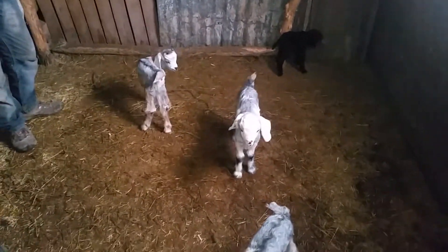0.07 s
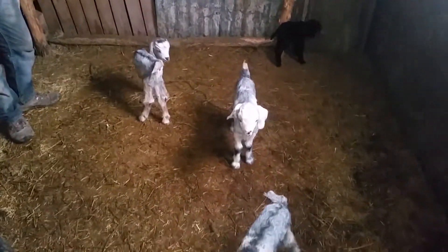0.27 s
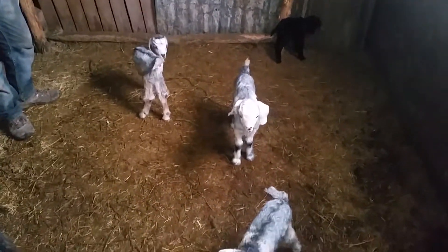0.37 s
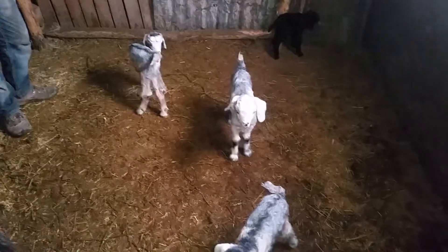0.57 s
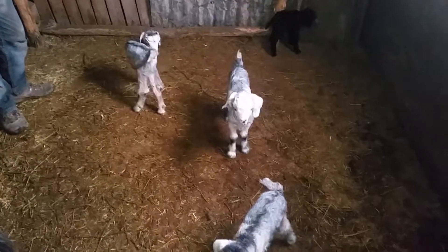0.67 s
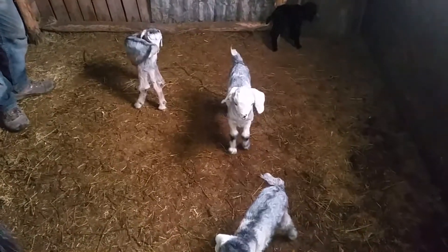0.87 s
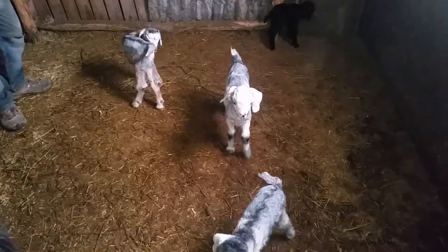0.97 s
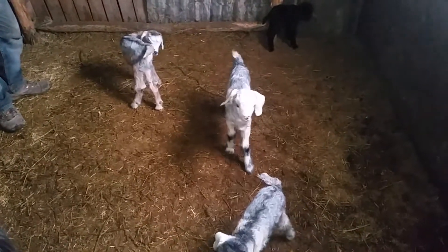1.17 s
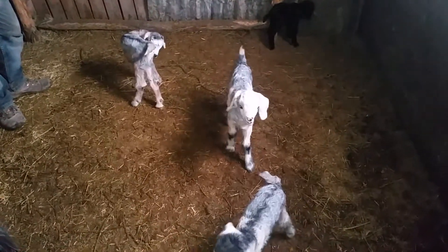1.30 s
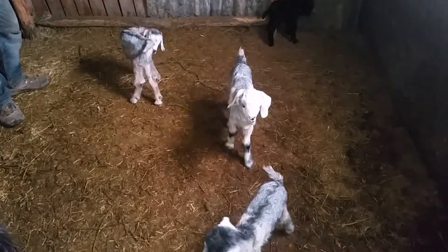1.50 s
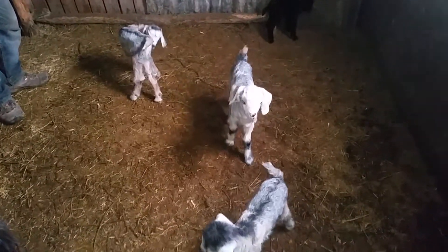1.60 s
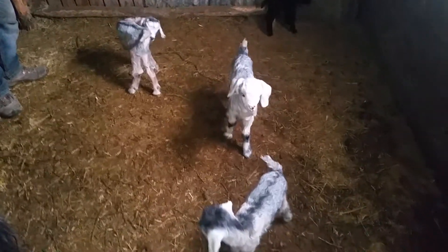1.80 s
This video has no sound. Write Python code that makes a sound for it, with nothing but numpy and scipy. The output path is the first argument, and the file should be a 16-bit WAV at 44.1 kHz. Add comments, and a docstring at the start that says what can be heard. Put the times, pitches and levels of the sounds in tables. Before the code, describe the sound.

Goat kids step about close by on the left in a small shed. Their hooves thud softly, knock on wood and rustle and snap dry straw. The rustling fades, leaving two lone steps over a low rumble.

```python
"""Goat kids step about on the straw-covered earth floor of a small shed, close by and to the left.
Their hooves thud softly on the earth, and a few knock on wood and make it ring. Straw hisses as its
stalks rub together, and some of them snap. The rustle dies away after a second and leaves two lone
steps over a low rumble."""
import sys
import numpy as np
from scipy import signal
from scipy.fft import rfft, irfft
from scipy.io import wavfile

SR = 44100
rng = np.random.default_rng(int(sys.argv[2]) if len(sys.argv) > 2 else 0)


def unload_audio(sound):
    """Save the sound as a 16-bit wav file, at the path given as the first command line argument."""
    columns = np.transpose(np.atleast_2d(sound))
    # keep every value between -1 and 1, then stretch to whole-number steps
    steps = np.round(np.clip(columns, -1, 1) * 32767)
    wavfile.write(sys.argv[1], SR, steps.astype(np.int16))


N = 81585
TIME = np.arange(N) / SR
FFT_SIZE = 2 ** 17
FREQS = np.arange(FFT_SIZE // 2 + 1) * SR / FFT_SIZE

# soft steps on the earth: t/s, level/dB, f/Hz
STEPS = [(0.045, -40, 221), (0.12, -39, 260), (0.238, -28.5, 228), (0.254, -26, 189), (0.262, -32, 300),
         (0.291, -30.5, 180), (0.308, -33, 280), (0.336, -34.5, 253), (0.352, -29, 232),
         (0.384, -33.5, 248.4), (0.423, -30, 278), (0.446, -34, 325), (0.647, -25.5, 289),
         (0.652, -24, 170), (0.673, -24, 251), (0.684, -26.5, 332), (0.71, -34, 302), (0.750, -55, 200),
         (1.124, -30, 225.6), (1.137, -33.5, 160), (1.157, -38, 227.5), (1.172, -42.5, 204),
         (1.286, -45, 281), (1.470, -48.5, 261), (1.589, -38, 276), (1.624, -44, 248), (1.719, -48.5, 237),
         (1.736, -45.5, 282)]
# the shed's own low notes: f/Hz, level/dB, ring time/s
SHED_NOTES = [(97, -8, 0.083), (170, -23, 0.14), (233.5, -19, 0.45), (300, -21, 0.19), (350.5, -20.5, 0.32)]


def thuds():
    """Each step is a short thump with a dull push of weight under it; the shed hums in answer."""
    steps = [(from_db(db) * SR / hz * click(s), hz) for s, db, hz in STEPS]
    push = low_pass(sum(force for force, hz in steps), hz=120, order=3)
    thump = sum(low_pass(band(force, hz, ratio=1.323), 1.4 * hz) for force, hz in steps)
    floor = thump + from_db(-19) * push
    return in_shed(floor, room_db=0.5) + from_db(-38) * ring(floor, SHED_NOTES)


# hooves hitting wood: t/s, level/dB
WOOD_HITS = [(0.256, -30), (0.299, -25.5), (0.416, -28), (0.426, -22.5), (0.455, -39.5), (0.688, -30.5),
             (1.589, -44)]
# the board's own notes: f/Hz, level/dB, ring time/s
BOARD_NOTES = [(507, -21.5, 0.1), (572, -1.5, 0.078), (634, -14, 0.24), (854, -18.5, .08), (912, -15, 0.11),
               (1431, -10, 0.01)]


def knocks():
    """Harder steps make a wooden board ring."""
    force = low_pass(sum(from_db(db) * click(s) for s, db in WOOD_HITS), hz=1480)
    return in_shed(ring(force, BOARD_NOTES), room_db=1)


# how loud the dragged straw is: t/s, level/dB
RUSTLE_LEVEL = [(0, -65.5), (0.06, -62.5), (0.11, -53.5), (0.2, -57.5), (0.25, -40.5), (0.31, -52),
                (0.40, -54), (0.49, -72.5), (0.54, -53.5), (0.595, -47.5), (0.65, -51.5), (0.72, -57.5),
                (0.80, -59.5), (0.92, -64.5), (1.03, -69), (1.3, -68.5), (1.5, -82), (1.85, -73)]
# its tone, from bass to treble: f/Hz, level/dB
RUSTLE_TONE = [(60, 0.5), (250, 8), (600, 7.5), (900, -3), (1600, -2.5), (2700, -10), (4000, -25.5),
               (5500, -34), (8000, -59.5), (16000, -46)]
STRAW_ROOM_DB = 1.5


def rustle():
    """Straw rubs on straw as it is dragged about."""
    return tint(rubbing(level(RUSTLE_LEVEL), STRAW_ROOM_DB), RUSTLE_TONE)


# hooves scuffing straw: t/s, level/dB, fade time/s, treble limit f/Hz
HOOF_SCUFFS = [(0.231, -41, 0.0071, 2600), (0.259, -44.5, 0.0053, 2600), (0.415, -39.5, .02, 1600),
               (0.678, -32, 0.0093, 2200), (0.7, -48, 0.017, 2600), (0.836, -48.5, 0.019, 2800),
               (0.865, -48, 0.008, 2400), (1.585, -53.5, 0.032, 1200), (1.753, -58.5, 0.014, 1300)]
# their tone: f/Hz, level/dB
SCUFF_TONE = [(60, -17.5), (300, -3), (550, 3.5), (800, 7.5), (1100, 2.5), (1600, 1), (2500, -1),
              (3300, -13), (4500, -17), (8000, -42.5), (16000, -44.5)]


def scuffs():
    """A hoof brushes the straw in one quick rub."""
    out = 0
    for s, db, fade_s, hz in HOOF_SCUFFS:
        envelope = from_db(db) * burst(s, rise_s=0.0014, fade_s=fade_s)
        out += low_pass(rubbing(envelope, room_db=-1), hz)
    return tint(out, SCUFF_TONE)


# one sliding hoof: t/s, level/dB, pitch f/Hz
HOOF_SLIDE = [(0.51, -68.5, 3080), (0.55, -66.5, 2630), (0.578, -44, 1400), (0.603, -37.5, 700),
              (0.625, -55, 600), (0.65, -74, 557)]


def slide():
    """A scrape falls in pitch as the hoof slows."""
    s, db, hz = np.transpose(HOOF_SLIDE)
    pitch_octaves, width_octaves = np.interp(TIME, s, np.log2(hz)), 0.29
    grit = rubbing(np.ones(N), STRAW_ROOM_DB)
    out = 0
    for band_hz in np.geomspace(400, 4500, 8):
        part = band(grit, band_hz, ratio=1.2)
        distance = (np.log2(band_hz) - pitch_octaves) / width_octaves
        out += part / part.std() * np.exp(-.5 * distance ** 2)  # loudest near the pitch
    sliding = (TIME > s[0]) & (TIME < s[-1])
    return out / 2 * from_db(np.interp(TIME, s, db)) * sliding


# stalks snapping: t/s, level/dB, treble limit f/Hz
STALK_SNAPS = [(0.261, -39.5, 2340), (0.508, -36, 15000), (0.514, -59.5, 7000), (0.546, -45, 4000),
               (0.564, -50.5, 15000), (0.678, -34.5, 2460), (0.698, -35.5, 3150), (0.714, -41, 3000),
               (0.863, -38, 2550), (0.922, -52.5, 15000)]
# the tone of their crackle: f/Hz, level/dB
CRACKLE_TONE = [(300, -23.5), (1200, 11), (2300, 5), (3100, 8), (4200, -7.5), (7000, -14), (9000, -36.5),
                (13000, -14), (16000, -9)]
# a stalk's own notes: f/Hz, level/dB, ring time/s
STALK_NOTES = [(2180, -13, 0.052), (3070, -13.5, 0.015)]


def snaps():
    """Dry stalks break with a tiny crackle and a short ring."""
    crackle = breaks = 0
    for s, db, hz in STALK_SNAPS:
        envelope = from_db(db) * burst(s, rise_s=0.00025, fade_s=0.0017)
        crackle += low_pass(rubbing(envelope, room_db=-0.5), hz, order=3)
        breaks += low_pass(from_db(db) * click(s), hz, order=3)
    return tint(crackle, CRACKLE_TONE) + ring(breaks, STALK_NOTES)


# how loud the rumble is: t/s, level/dB
RUMBLE_LEVEL = [(0, -49), (0.12, -49.5), (0.34, -46.5), (0.55, -47.5), (0.61, -55.5), (0.68, -44),
                (0.85, -47.5), (0.97, -50.5), (1.06, -58.5), (1.13, -49), (1.3, -50), (1.5, -56),
                (1.56, -56), (1.62, -53.5), (1.75, -49.5), (1.85, -57.5)]
# its tone: f/Hz, level/dB
RUMBLE_TONE = [(12, -21), (26, -6), (42, 0.5), (65, 1.5), (100, 0.5), (135, -9), (230, -9), (400, -20),
               (800, -35.5), (3000, -64.5)]
# how loud the fine hiss is: t/s, level/dB
HISS_LEVEL = [(0, -79), (0.11, -73.5), (0.26, -66.5), (0.42, -70), (0.58, -68), (0.82, -71.5), (0.925, -74),
              (1.0, -78), (1.5, -84), (1.85, -85.5)]
# its tone: f/Hz, level/dB
HISS_TONE = [(2000, -14.5), (5000, -1), (8000, -32.5), (10000, -16.5), (12500, -5), (15500, 1)]
# the tone of the shed's still air: f/Hz, level/dB
AIR_TONE = [(100, 1), (500, 0.5), (1000, -2.5), (2500, -1.5), (4000, -18.5), (5500, -24), (8000, -28),
            (15000, -21)]


def background():
    """A low rumble and a fine hiss swell and fade over faint, still air."""
    rumble = tint(wide_noise(), RUMBLE_TONE) * level(RUMBLE_LEVEL)
    hiss = tint(np.array([grains(), grains()]), HISS_TONE) * level(HISS_LEVEL)
    air = from_db(-76) * tint(wide_noise(), AIR_TONE)
    return rumble + hiss + air


# how wide the shed sounds (unshared over shared noise): f/Hz, level/dB
SHED_WIDTH = [(50, -4.5), (200, -18), (500, -18), (1000, 7), (3000, 3.5)]
ECHO_S = 0.19  # time for the echo to fall by 60 dB


def wide_noise():
    """Noise whose left and right are alike in the bass and differ higher up."""
    shared, unshared = rfft(rng.standard_normal((2, FFT_SIZE)))
    width = response(SHED_WIDTH)
    left_right = shared + unshared * width * [[1], [-1]]
    return irfft(left_right / np.sqrt(1 + width ** 2))[:, :N]


def in_shed(x, room_db):
    """The sound itself plus its short echo from the walls."""
    echo = wide_noise() * burst(0.0013, rise_s=0.0013, fade_s=ECHO_S / np.log(1000))
    echo /= np.sqrt(np.sum(echo ** 2) / 2)
    return x + from_db(room_db) * signal.fftconvolve(echo, np.atleast_2d(x), axes=1)[:, :N]


def rubbing(envelope, room_db):
    """Grainy rubbing follows a loudness curve (the envelope); the walls add a smooth echo."""
    keep = np.exp(-2 * np.log(1000) / (ECHO_S * SR))
    echo_level = np.sqrt(signal.lfilter([1 - keep], [1, -keep], envelope ** 2 + 1e-18))
    return grains() * envelope + from_db(room_db) * echo_level * wide_noise()


def grains(slips_per_s=2100, spread_db=3, smooth_share=0.17):
    """Stalks slip over each other: tiny uneven clicks in a smooth hiss."""
    sizes = from_db(spread_db * np.minimum(rng.exponential(1, N), 4))
    slips = sizes * rng.choice([-1, 1], N) * (rng.random(N) < slips_per_s / SR)
    smooth = rng.standard_normal(N)
    return np.sqrt(1 - smooth_share) * slips / slips.std() + np.sqrt(smooth_share) * smooth


def ring(x, notes):
    """A tap starts each note, which falls by 60 dB over its ring time."""
    out = 0
    for hz, db, ring_s in notes:
        keep, turn = np.exp(-np.log(1000) / (ring_s * SR)), 2 * np.pi * hz / SR
        feedback = [1, -2 * keep * np.cos(turn), keep * keep]
        out += from_db(db) * signal.lfilter([0, np.sin(turn)], feedback, x + 1e-18)
    return out


def click(s):
    """A one-sample tap at time s."""
    return 1.0 * (np.arange(N) == int(s * SR))


def burst(s, rise_s, fade_s):
    """A loudness curve that rises at time s, then dies away."""
    age = np.maximum(TIME - s, 0)
    return np.minimum(age / rise_s, 1) * np.exp(-np.maximum(age - rise_s, 0) / fade_s)


def from_db(db):
    """Turn decibels into a gain, a number to multiply by."""
    return 10 ** (np.asarray(db) / 20)


def level(rows):
    """Join t/s, level/dB points into a gain over time."""
    return from_db(np.interp(TIME, *np.transpose(rows)))


def response(points):
    """Join f/Hz, level/dB points into a gain for each frequency."""
    hz, db = np.transpose(points)
    return from_db(np.interp(np.log(FREQS + 1), np.log(hz), db))


def colour(x, gain):
    """Turn each frequency up or down, with no sound arriving early."""
    cepstrum = irfft(np.log(gain + 1e-9))
    cepstrum[1:FFT_SIZE // 2] *= 2
    cepstrum[FFT_SIZE // 2 + 1:] = 0
    return irfft(rfft(x, FFT_SIZE) * np.exp(rfft(cepstrum)))[..., :N]


def tint(x, points):
    """Change the tone of a noise, with an average power gain of one."""
    gain = response(points)
    return colour(x, gain / np.sqrt(np.mean(gain ** 2)))


def low_pass(x, hz, order=2):
    """Dull the sound above hz."""
    return signal.sosfilt(signal.butter(order, hz, fs=SR, output="sos"), x + 1e-18)


def band(x, hz, ratio):
    """Keep the frequencies around hz."""
    edges_hz = [hz / ratio, hz * ratio]
    return signal.sosfilt(signal.butter(2, edges_hz, "band", fs=SR, output="sos"), x + 1e-18)


def scene():
    """Add up all the sounds; they reach the left microphone first."""
    hooves = thuds() + knocks()
    straw = in_shed(rustle() + scuffs() + slide() + snaps(), room_db=-6.5)
    left, right = hooves + straw + background()
    right_delay_s = 0.0003
    return np.array([left, np.pad(right, (int(right_delay_s * SR), 0))[:N]])


# how much louder the left is than the right: f/Hz, level/dB
LEFT_BOOST = [(60, 1.5), (150, 0), (280, 3.5), (550, 4), (1200, 6.5), (2600, 6.5), (4000, 2), (8000, -2),
              (13000, 2.5)]


def record(dry):
    """The left microphone hears more of the middle range; the highest treble is cut."""
    boost = np.sqrt(response(LEFT_BOOST))
    heard = np.array([colour(dry[0], boost), colour(dry[1], 1 / boost)])
    top_hz = 15850
    return signal.sosfilt(signal.ellip(12, .1, 80, top_hz, fs=SR, output="sos"), heard)


dry = scene()
out = record(dry)
unload_audio(out)
```